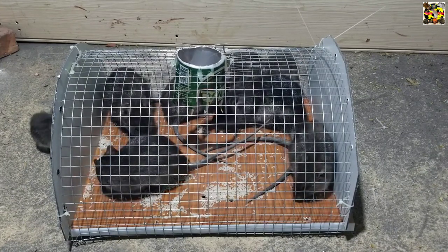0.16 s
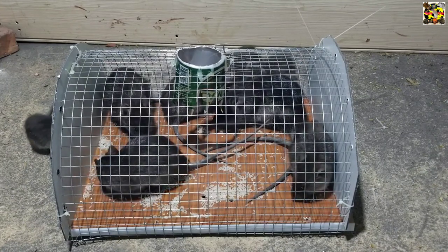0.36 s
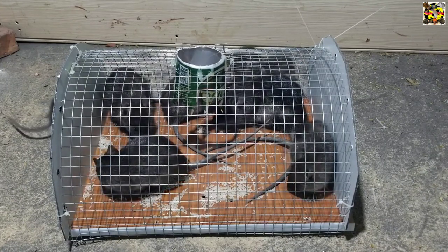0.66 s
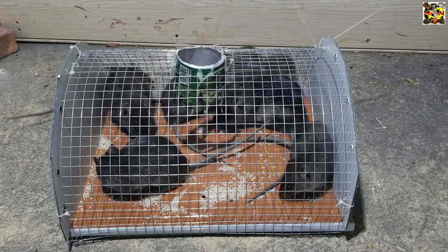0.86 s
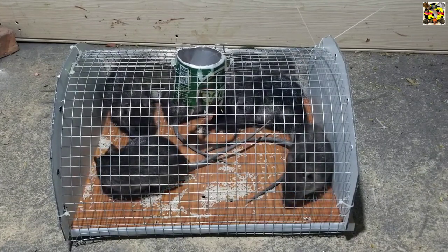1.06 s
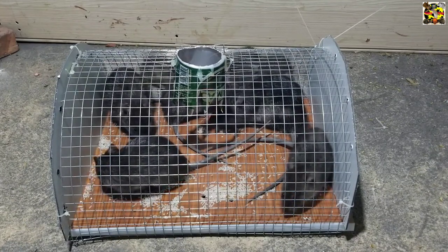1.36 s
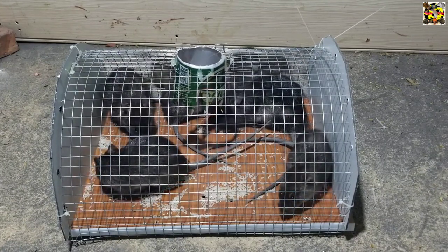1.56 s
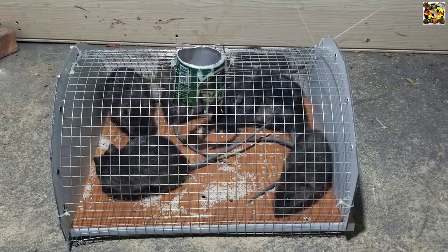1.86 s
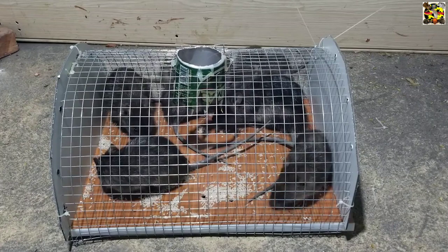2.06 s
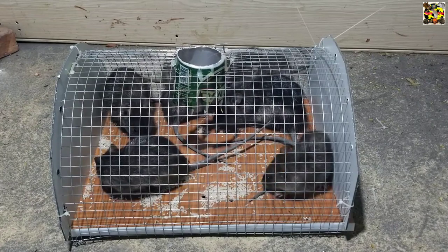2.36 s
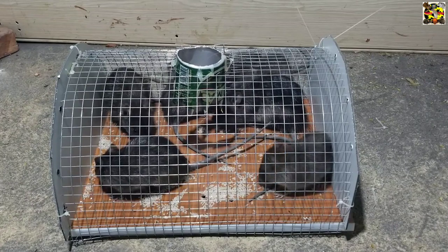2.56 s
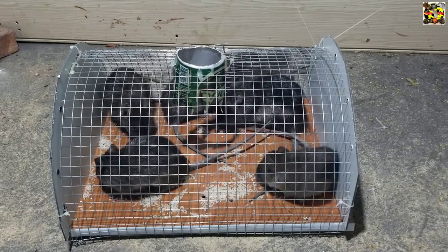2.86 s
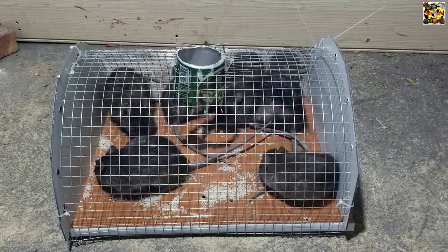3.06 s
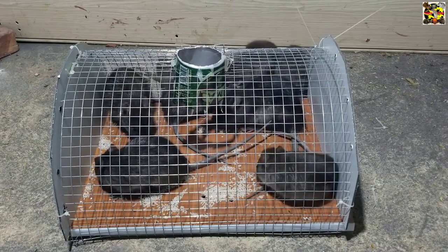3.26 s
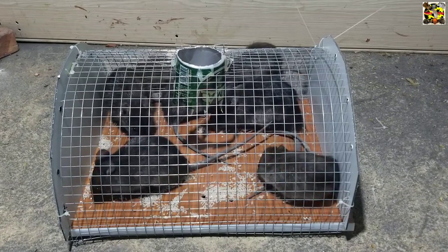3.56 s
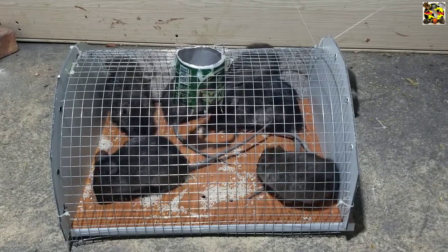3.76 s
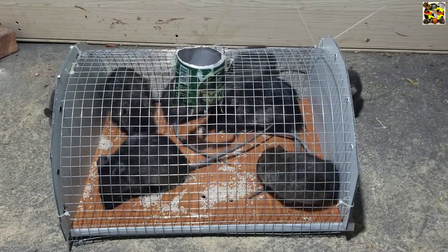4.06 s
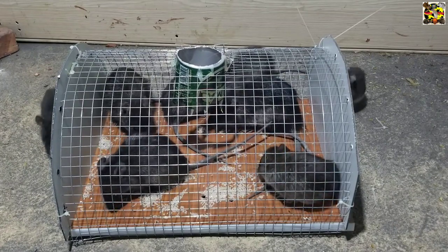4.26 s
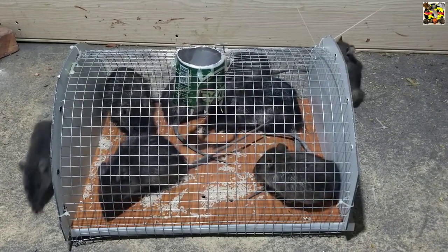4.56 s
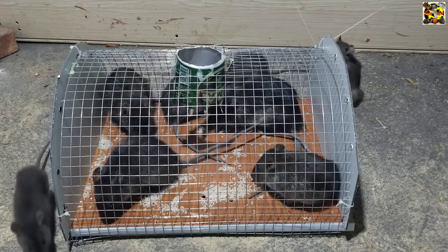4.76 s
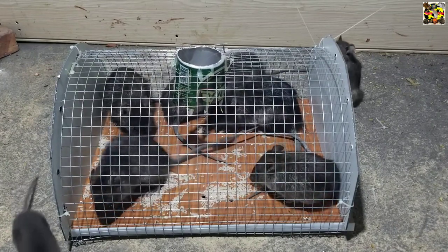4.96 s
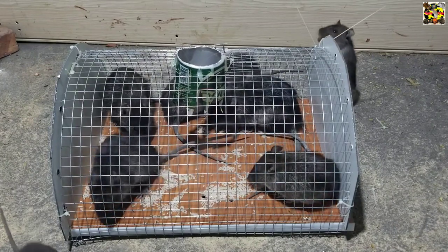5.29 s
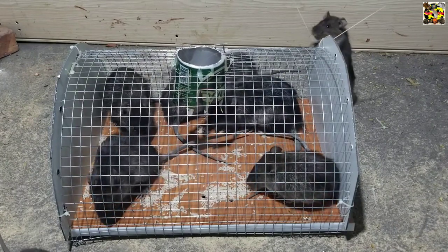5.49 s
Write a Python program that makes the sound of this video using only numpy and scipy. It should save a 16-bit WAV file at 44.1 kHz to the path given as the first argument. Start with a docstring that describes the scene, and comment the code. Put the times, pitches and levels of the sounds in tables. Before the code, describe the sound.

Rats give two short bouts of rough squeals and low grunts while their claws tick and rattle on a wire cage.

```python
"""Rough squeals, grunts and short high calls come in two bouts from rats in a wire cage to the right.
Each call is a buzz of vocal folds plus puffs of breath, coloured by throat and mouth.
Claws tick on the mesh, paws thump on boards, loose wire ends jingle and the litter rustles.
Hard walls throw short reflections; insects buzz far off over a low rumble."""
import sys
import numpy as np
from scipy import signal
from scipy.fft import rfft, irfft, next_fast_len
from scipy.io import wavfile

SR = 44100
rng = np.random.default_rng(int(sys.argv[2]) if len(sys.argv) > 2 else 0)


def log_audio(samples):
    """Write samples as a 16-bit WAV file to the path given in sys.argv[1]."""
    # one column per channel
    frames = np.atleast_2d(samples).T
    # limit to full scale, then quantise
    limited = np.clip(frames, -1, 1)
    pcm = np.round(limited * 32767).astype(np.int16)
    wavfile.write(sys.argv[1], SR, pcm)


N = 248283

# colour of the open throat and body: f/Hz, level/dB
OPEN_THROAT = [(300, -21), (520, -9.5), (750, 5.5), (1120, 4), (1480, 2), (1800, -0.5), (2100, -5),
               (2700, 0), (3700, -3), (4500, -4), (5300, -0.5), (5800, -4.5), (6500, -2.5), (7300, -11.5),
               (8400, -10.5), (14000, -13), (16000, -22)]


def squeals():
    """Long, wavering cries: the mouth resonance rides at a fixed multiple of the pitch."""
    # per cry: mouth/pitch ratio, roughness added per band, and a curve of
    # t/s, effort/dB, treble/dB re effort, shrill/dB re effort, pitch/Hz, roughness
    cries = [(1.57, 0.33, [(.144, -42, -7, -3.5, 511.6, 0.3), (.165, -39.5, -0.5, -8.5, 516.6, 0.78),
             (.184, -38, -13, -12, 550.4, 0.57), (.196, -34.5, -8, -18, 565.4, 0),
             (.25, -33.5, -15, -20.5, 560.5, 0.06), (.268, -41, -3, -3.5, 573.7, 0.5),
             (.29, -39.5, -2, -12, 556.6, 1.25), (.305, -46, 4.5, -2.5, 562.5, 0.42),
             (.349, -39.5, -4.5, -10, 559, 0.47)]), (1.42, 0.26, [(.347, -41, -2, -6.5, 764.6, 0.26),
             (.375, -37, -6, -6, 724.4, 0.23), (.4, -38.5, -5.5, -5.5, 691, 0.04),
             (.425, -42, -1.5, -8.5, 687.7, 0.72), (.48, -43, -8.5, -12.5, 702.4, 0.59),
             (.55, -60.5, -5, -10, 701, 0.4)]), (1.446, 0.28, [(2.577, -42, -3, -6, 679, 0.1),
             (2.587, -35.5, -13, -6.5, 632.3, 0.01), (2.612, -34.5, -9.5, -11.5, 691, 0.1),
             (2.632, -35.5, -6, -12.5, 884.5, 0.14), (2.65, -42.5, 6, -3.5, 863, 0.21),
             (2.668, -34, -13, -21, 795.4, 0.67), (2.716, -51, 2, -12, 790, 0.8)]),
             (2.4, 0.43, [(2.712, -49.5, -6, -29, 520.7, 0.53), (2.745, -36, -4, -3.5, 541.7, 0.62),
             (2.77, -36.5, -3, -3.5, 526.5, 0.82), (2.808, -34, -17, -12, 482.5, 0.6)]),
             (1.45, 0.29, [(2.806, -35.5, -2.5, -8, 690, 0.8), (2.83, -34.5, -11.5, -6, 643, 0.58),
             (2.847, -34, -3, -9, 646, 0.4), (2.853, -40, -4, -7, 752.5, 0.38),
             (2.87, -31.5, -9.5, -7.5, 739.4, 0.33), (2.89, -44.5, 9, 4, 716.5, 0.3),
             (2.915, -42.5, -7.5, -10.5, 734, 0.83), (2.945, -50, 8, 5, 696, 1.1)]),
             (1.6, 0.31, [(3.116, -49, -24, -30, 647, 0.58), (3.135, -40, -1, -20, 710, 0.45),
             (3.15, -39, -2.5, -8, 868, 0.13), (3.163, -36, 2, -4, 894.4, 0.1),
             (3.185, -34, -5, -9, 894, 0.08), (3.211, -36.5, 4, -2.5, 917, 0.97)]),
             (1.5, 0.34, [(3.209, -35.5, -12, -16, 776.4, 0.73), (3.24, -36.5, -5, -14, 747.7, 0.49),
             (3.275, -39, -3, -7.5, 705, 0.53), (3.316, -35.5, -8.5, -17, 700.5, 0.7),
             (3.345, -42, -8.5, -13, 704, 1.1), (3.385, -52.5, -4, -10, 700, 0.23)])]
    mix = np.zeros(N)
    for ratio, hoarse, curve in cries:
        rows = [(*row, ratio * row[4]) for row in curve]
        odd_db = -7 if round(ratio) == 2 else 0  # voiced on the second harmonic: weaker odd overtones
        add(mix, *call(rows, OPEN_THROAT, jitter=.0493, doubling=.063, sharp=1.86,
                       hoarse=hoarse, odd_db=odd_db))
    return mix


def peeps_and_grunt_overtone():
    """Brief peeps, plus the ringing overtone of the grunt at 3.4 s; the mouth is tuned to each tone."""
    # t/s, length/s, effort/dB, first f/Hz, last f/Hz, roughness
    tones = [(0.014, 0.061, -48, 714, 770, 0.53), (0.086, 0.04, -54.5, 706, 682, 0.35),
             (1.737, 0.062, -48, 734, 625, 0.04), (3.32, 0.011, -30.5, 1370, 1460, 0.22),
             (3.421, 0.037, -39.5, 997, 968, 0.17), (5.253, 0.033, -50.5, 645, 654, 0.5)]
    mix, treble_db = np.zeros(N), -39
    for s, length, db, first_hz, last_hz, rough in tones:
        rows = short_call(s, length, db, treble_db, first_hz, last_hz, rough, (first_hz + last_hz) / 2)
        add(mix, *call(rows, OPEN_THROAT, jitter=.051, doubling=.15, sharp=2.9, hoarse=.1))
    return mix


def grunts():
    """Low, nasal pulses through a shut throat, sagging slightly in pitch."""
    # t/s, length/s, effort/dB, treble/dB re effort, pitch/Hz, roughness, mouth/Hz, nasal band/dB
    pulses = [(0.612, 0.069, -43.5, -14.5, 257.3, 0.17, 1040, -3),
              (0.8, 0.047, -48.5, -18, 236.8, 0.29, 950, -6.5),
              (0.985, 0.019, -53.5, -40, 233.7, 0.12, 830, -6),
              (1.674, 0.078, -49, -16.5, 256.8, 0.5, 830, -10.5),
              (2.014, 0.043, -48.5, -9, 256.4, 0.66, 890, -4),
              (2.092, 0.11, -44.5, -15.5, 229.7, 0.32, 890, 0),
              (2.435, 0.056, -44, -13.5, 259.6, 0.36, 1030, -1.5),
              (2.951, 0.066, -45, -6.5, 261.2, 0.23, 920, -5.5),
              (3.057, 0.11, -47, -16, 267.2, 0.55, 970, 0),
              (3.405, 0.073, -44.5, -13.5, 328.2, 0.4, 920, -2.5),
              (3.48, 0.054, -51, -25, 306.3, 0.39, 915, -4),
              (3.569, .055, -42.5, -14.5, 230, 0.24, 860, -0.5),
              (3.698, 0.047, -42.5, -17.5, 236, 0.15, 930, -1.5),
              (3.843, 0.063, -46, -14.5, 213.5, 0.26, 875, -2),
              (3.98, .022, -49.5, -17.5, 226, 0.44, 860, -12), (4.527, 0.06, -56, -6.5, 242, 0.7, 800, -4),
              (4.627, 0.035, -56, -7, 224.8, 0.7, 700, 0)]
    # colour of the shut throat: f/Hz, level/dB
    shut_throat = [(250, -42), (430, -3), (700, -3), (1200, -1), (1400, 3.5), (1550, 0.5), (1850, 0.5),
                   (2200, -15), (3400, -11.5), (8000, -26), (12000, -1)]
    mix, sag = np.zeros(N), .038
    for s, length, db, treble_db, hz, rough, mouth_hz, nasal_db in pulses:
        throat = [(f, d + nasal_db * (1300 < f < 2500)) for f, d in shut_throat]
        first_hz, last_hz = hz * (1 + sag / 2), hz * (1 - sag / 2)
        rows = short_call(s, length, db, treble_db, first_hz, last_hz, rough, mouth_hz)
        add(mix, *call(rows, throat, jitter=.041, doubling=.22, sharp=3.13, hoarse=.34, smear=.3))
    return mix


def short_call(s, length, db, treble_db, first_hz, last_hz, rough, mouth_hz):
    """Control rows of a short tone that swells, holds, then falls as the breath runs out."""
    # t/length, level/dB
    envelope = [(0, -9.5), (.08, -3.5), (.35, 1), (.75, -1), (1.2, -11.5)]
    shrill_db = treble_db - 8
    return [(s + u * length, db + d, treble_db, shrill_db,
             first_hz + u * (last_hz - first_hz), rough, mouth_hz) for u, d in envelope]


def call(rows, throat, jitter, doubling, sharp, hoarse, odd_db=0, smear=1):
    """Start time and sound of a call: fold harmonics and puffs of air through throat and mouth."""
    # edges of the body, treble and shrill bands: f/Hz
    edges = [0, 2200, 4800, 30000]
    s, *columns = np.transpose(rows)
    t = np.arange(s[0], s[-1], 1 / SR)
    effort_db, treble_db, shrill_db, hz, rough, mouth_hz = (np.interp(t, s, c) for c in columns)
    rough = np.clip(rough, 0, 1)
    skirt = .6 * amp(1.5 * np.minimum(treble_db, 0))  # a dull call keeps little beside the resonance
    turns = np.cumsum(hz * (1 + jitter * rough * drift(len(t), 126))) / SR
    k = np.arange(1, 9000 // hz.max())[:, None]
    flutter_db = np.log2(1 + k) * drift((len(k), len(t)), 40)  # high overtones flutter most
    mouth = skirt + 1 / (1 + (sharp * np.log(k * hz / mouth_hz)) ** 2)
    sizes = amp(read(throat, k * hz) + flutter_db + odd_db * (k % 2) * (k > 1)) * mouth
    pulses = 1 + doubling * rough * np.cos(np.pi * turns)  # strong and weak pulses alternate
    puffs = (.37 + np.exp(-(turns % 1) / .44)) * rng.standard_normal(len(t))
    waves = np.cos(2 * np.pi * (k * turns + smear * rng.random(k.shape)))  # the throat smears each pulse
    frayed = waves * drift(waves.shape, 170)  # each overtone as a narrow band of noise
    worn = np.clip(.3 * rough * (k - 1), 0, 1) * smear  # high overtones fray first
    waves = crossfade(waves, frayed, worn)
    out = 0
    for band, db in enumerate((effort_db, effort_db + treble_db, effort_db + shrill_db)):
        inside = lambda f: (f > edges[band]) & (f <= edges[band + 1])
        part = sizes * inside(k * hz)
        part = pulses * part / np.sqrt((part ** 2).sum(axis=0) / 2 + 1e-20)
        hiss = shaped(puffs, lambda f: amp(read(throat, f)) * inside(f))
        if band == 0:
            hiss = 17 * skirt * hiss + resonate(resonate(hiss, mouth_hz, 760), mouth_hz, 760)
        tone = (part * waves).sum(axis=0)
        rasp = crossfade(evened(hiss), (part * frayed).sum(axis=0), .35)
        share = np.clip(rough + hoarse * band, 0, 1)  # the treble breaks up first
        out = out + amp(db) * crossfade(tone, rasp, share)
    return s[0], out * signal.windows.tukey(len(t), min(1, .0017 * SR / len(t)))


def ticks():
    """A claw snaps on the wire, the mesh rattles and rings; paws add a dull thump on the board."""
    # t/s, level/dB, thump/dB re level, t60/s, tilt/dB per octave, ring/Hz, ring/dB re level
    steps = [(0.0375, -35.5, -30, 0.19, -2, 3380, -23), (0.0836, -31, -22.5, 0.22, -2, 4270, -38),
             (0.683, -40.5, -32, .19, -2.5, 3200, -13), (0.7357, -47, -26, 0.61, -0.5, 4470, -16),
             (1.0855, -44.5, -25.5, 0.35, -4, 2760, -10), (1.3401, -51, -38, 1, 0.5, 3260, -13),
             (1.407, -45, -15.5, 0.11, 2, 3220, -11), (1.679, -34.5, -27, 0.12, 0, 2950, -12),
             (1.8899, -44.5, 8, 0.11, -5, 2460, -2), (2.036, -35, -22, 0.17, -5.5, 4060, -6),
             (2.219, -34.5, -26, 0.13, -4.5, 2540, -3.5), (2.42, -41, -16, 0.12, -5.5, 2700, -18),
             (2.489, -43.5, -4, 0.078, 2, 2800, -15), (2.745, -40.5, -14, 0.33, -2, 2530, -8),
             (3.519, -40.5, -15.5, 0.43, 8, 4000, -30), (3.5862, -44, -17, 0.12, 8, 4350, -14),
             (4.233, -49, -51, 0.12, -2, 3720, 0), (4.253, -36, -46, 0.1, -1, 3270, -1),
             (4.4063, -36, -51, 0.19, 3, 3850, -15), (4.6038, -49.5, 0.5, 0.18, 4, 3240, -3),
             (4.7889, -51, -12.5, 0.34, 1, 3060, -21), (4.8864, -48, -20.5, 0.61, 1.5, 4230, -18),
             (5.087, -51, -17, 0.25, 4.5, 3000, -23), (5.3621, -42, -23, 0.25, -1, 3090, -14),
             (5.543, -45.5, -20, 0.2, 0.5, 3040, -11)]
    # colour of a tick: f/Hz, level/dB
    spectrum = [(600, -82), (1100, -2), (1700, -7.5), (2500, -4.5), (3100, -0.5), (4200, -1), (7540, -0.5),
                (8780, -8.5), (14700, -2.5), (15700, -22), (16300, -51)]
    # a claw catches, then the wire slaps back: t/s, level/dB
    bounces = [(.0003, 0), (.0024, -4), (.0049, -7)]
    # mesh modes: f/ring pitch, level/dB, t60/s
    modes = [(.86, -4, .02), (.93, -2, .016), (1, 0, .019), (1.08, -1, .015), (1.17, -4, .014)]
    mix, t = np.zeros((2, N)), np.arange(9000) / SR
    snap_db, left_late_s = 3, .0004  # the cage is nearer the right microphone
    for s, db, thump_db, t60, tilt_db, ring_hz, ring_db in steps:
        noise = rng.standard_normal((2, len(t)))
        noise[1] = .27 * noise[0] + .86 * noise[1]
        colour = lambda f: amp(read(spectrum, f) + tilt_db * np.log2(f / 4000 + .03))
        mesh = evened(shaped(noise, colour))
        board = evened(shaped(noise, lambda f: (f / 500) / (1 + (f / 600) ** 2.1)))
        rattle = amp(1.1 * drift(len(t), 230))
        clicks = sum(amp(d) * rng.choice([-1, 1]) * signal.unit_impulse(len(t), round(late * SR))
                     for late, d in bounces)
        snap = shaped(clicks, colour)
        snap = amp(snap_db) * snap / abs(snap).max()
        attack = (.17 + .2 * amp(-60 * t / .018)) * (1 - np.exp(-t / .0012))
        decay = amp(-60 * t / t60)
        sound = mesh * attack * rattle * decay
        sound += [np.roll(snap, round(left_late_s * SR)), snap]
        sound += amp(thump_db) * board * (1 - np.exp(-t / .013)) * decay
        for ratio, mode_db, ring_t60 in modes:
            turns = ratio * ring_hz * rng.uniform(.99, 1.02) * t + rng.random((2, 1))
            sound += amp(ring_db + mode_db - 60 * t / ring_t60) * np.sin(2 * np.pi * turns)
        add(mix, s, amp(db) * sound)
    return mix


def jingles():
    """Each touch rings the loose wire ends by chance amounts, slightly detuned as they swing."""
    # touches: t/s, level/dB
    touches = [(3.51, -49), (3.519, -48), (3.525, -42), (3.53, -42), (3.533, -45), (3.55, -46),
               (3.586, -48.5), (3.591, -46), (3.615, -55)]
    # wire modes: f/Hz, level/dB, t60/s
    modes = [(8000, -10, .03), (9600, -10, .04), (11900, 0, .022), (12200, -2, .022), (13460, -1, .04),
             (14250, -2, .022), (15300, -6, .03)]
    mix, t = np.zeros((2, N)), np.arange(6000) / SR
    for s, db in touches:
        for hz, mode_db, t60 in modes:
            size, phase, tune = rng.random((3, 2, 1))
            turns = hz * (.992 + .016 * tune[0]) * t + phase
            add(mix, s, size[0] ** 1.5 * amp(db + mode_db - 60 * t / t60) * np.sin(2 * np.pi * turns)
                * np.sqrt(size / size[0]))
    return mix


def rustle():
    """Fur and feet scratch the litter in dense small grains, bright and wide."""
    # swells of movement: t/s, level/dB
    swells = [(0.0, -54.5), (0.15, -92), (0.56, -59.5), (1.18, -90.5), (1.73, -60), (1.9, -58.5),
              (2.1, -63), (2.54, -58), (2.79, -54), (2.96, -57.5), (3.18, -48), (3.4, -56.5), (3.999, -68),
              (4.27, -73), (4.44, -64.5), (5.0, -71.5), (5.63, -77)]
    grains = amp(3.2 * np.minimum(rng.exponential(1, (2, N)), 5)) * rng.standard_normal((2, N))
    bright = evened(shaped(grains, lambda f: (f / 3000) ** .57 / (1 + (f / 3000) ** 2.22)))
    s, db = np.transpose(swells)
    return bright * amp(np.interp(np.arange(N) / SR, s, db) + 2.1 * drift(N, 17))


def direct_path(rats):
    """The voices reach the left microphone round the end wall; bodies and walls shade the treble."""
    # delay on the left: f/Hz, phase lag/rad
    lag = [(200, 2.1), (650, 0.39), (850, 1.8), (1150, 1.58), (1800, 5.52), (3500, 4.68)]
    left = shaped(rats, lambda f: np.exp(-1j * read(lag, f)))
    pair = np.array([left, rats]) * amp([[.3], [-.6]])
    return shaped(pair, lambda f: (1 + (f / 3000) ** 2) ** -.15)


def room(x, t60):
    """Sparse echoes of random sign, separate for each side; the treble dies faster."""
    taps = rng.choice([-1., 1.], (2, SR // 2)) * (rng.random((2, SR // 2)) < .05)
    taps[:, :90] = 0  # 2 ms of pre-delay
    hz, t, spectra = signal.stft(taps, SR, nperseg=256)
    decay = amp(-60 * t / (t60 * (1 + hz[:, None] / 4000) ** -.4))
    tail = signal.istft(spectra * decay, SR, nperseg=256)[1]
    return signal.fftconvolve(np.atleast_2d(x), tail / np.linalg.norm(tail[0]), axes=1)[:, :N]


def insects(noise):
    """A far, wandering buzz: noise through a narrow, moving resonance."""
    # course of the buzz: t/s, level/dB, f/Hz
    course = [(0, -61, 3240), (1, -68, 3160), (1.5, -70, 3230), (2.5, -75.5, 3200), (3.5, -67, 3450),
              (4.2, -68, 3140), (4.45, -60, 3330), (4.651, -61.5, 3310), (5, -74, 3130), (5.63, -71, 3140)]
    s, *columns = np.transpose(course)
    db, hz = (np.interp(np.arange(N) / SR, s, c) for c in columns)
    return amp(db) * evened(resonate(resonate(noise, hz, 300), hz, 300))


def ambience():
    """A bed of rumble, hiss, hum and insects, centred in the bass and wide in the treble."""
    # stereo image: f/Hz, left-right likeness
    likeness = [(60, 1), (180, 0.8), (550, 0.8), (1650, -0.24), (4970, -1.1), (15000, -0.02)]
    # colour of the air: f/Hz, level/dB
    spectrum = [(22, -18), (42, 3), (70, -1.5), (103, 3.5), (135, -1), (231, -26), (474, -18), (779, -20.5),
                (1200, -13), (1800, -24.5), (2500, -36.5), (3600, -17.5), (5000, -23.5), (9000, -28),
                (14600, -23.5), (16300, -46)]
    # steady hum and insect bands: f/Hz, width/Hz, level/dB
    bands = [(97.5, 17, -76), (4270, 240, -76), (607, 88, -75)]
    left, other = rng.standard_normal((2, N))
    same = lambda f: np.clip(read(likeness, f), 0, 1)
    right = shaped(left, same) + shaped(other, lambda f: np.sqrt(1 - same(f) ** 2))
    pair = np.array([left, right])
    bed = amp(-67.5) * evened(shaped(pair, lambda f: amp(read(spectrum, f))))
    backwards = pair[:, ::-1]  # fresh noise with the same stereo image
    for hz, width, db in bands:
        bed += amp(db) * evened(shaped(backwards, lambda f: np.exp(-((f - hz) / width) ** 2)))
    return bed + insects(backwards)


def amp(db):
    return 10 ** (np.asarray(db) / 20)


def evened(x):
    """Scales x to rms 1."""
    return x / np.sqrt(np.mean(x ** 2) + 1e-20)


def crossfade(a, b, share):
    """Equal-power blend from a to b."""
    return np.sqrt(1 - share) * a + np.sqrt(share) * b


def read(points, hz):
    """Value of a curve at hz, on a log frequency axis."""
    f, value = np.transpose(points)
    return np.interp(np.log(hz + 1), np.log(f + 1), value)


def add(mix, s, sound):
    """Mixes a sound in at s seconds."""
    part = mix[..., round(s * SR):][..., :sound.shape[-1]]
    part += sound[..., :part.shape[-1]]


def shaped(x, gain):
    """Colours x by a gain that is a function of Hz."""
    size = next_fast_len(x.shape[-1])
    return irfft(rfft(x, size) * gain(np.fft.rfftfreq(size, 1 / SR)), size)[..., :x.shape[-1]]


def drift(shape, hz):
    """Random wobble with rms 1, rolled off above hz."""
    return evened(shaped(rng.standard_normal(shape), lambda f: 1 / (1 + (f / hz) ** 2)))


def resonate(x, hz, width):
    """A moving resonance: shifts the curve hz down to zero, smooths, and shifts back."""
    turn = np.exp(2j * np.pi * np.cumsum(hz) / SR)
    pole = np.exp(-np.pi * width / SR)
    return 2 * (turn * signal.lfilter([1 - pole], [1, -pole], x / turn)).real


def scene():
    """Voices and cage with their reflections, over the litter and the background."""
    rats = squeals() + peeps_and_grunt_overtone() + grunts()
    cage = ticks() + jingles()
    treble = shaped(rats, lambda f: f ** 3 / (f ** 3 + 1600 ** 3))
    near = amp(-4) * room(treble, t60=.14)  # boards and wall scatter the treble
    far = amp(-11.5) * room(rats, t60=.45)
    cage_tail = amp(-3.5) * room(cage, t60=.56)
    return direct_path(rats) + near + far + cage + cage_tail + rustle() + ambience()


def record(dry):
    """A steep low-pass takes off the very top."""
    lowpass = signal.firwin(511, cutoff=15600, window=("kaiser", 9), fs=SR)
    return signal.oaconvolve(dry, lowpass[None], "same")


dry = scene()
out = record(dry)
log_audio(out)
```